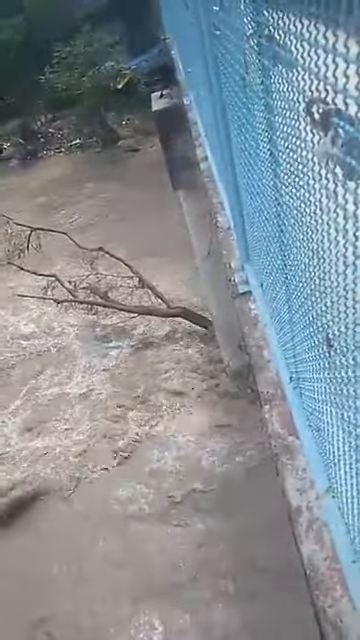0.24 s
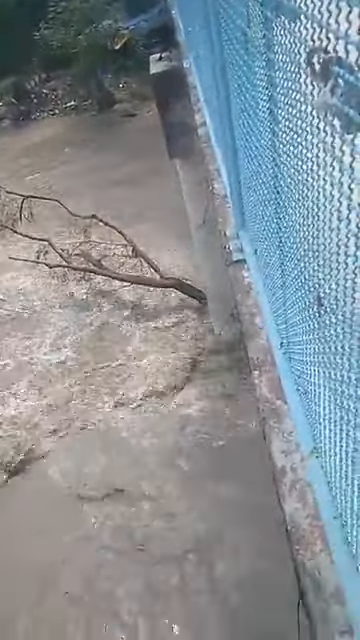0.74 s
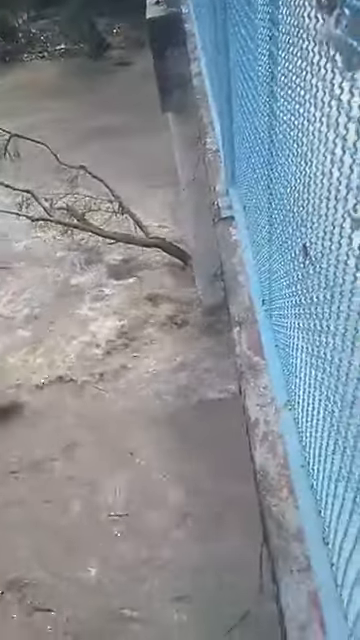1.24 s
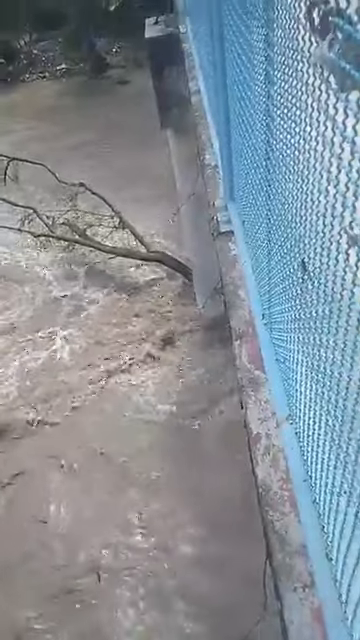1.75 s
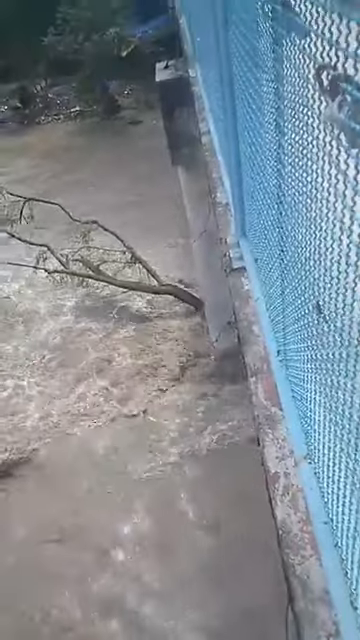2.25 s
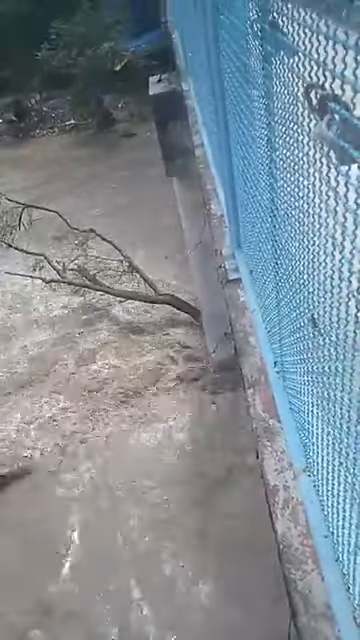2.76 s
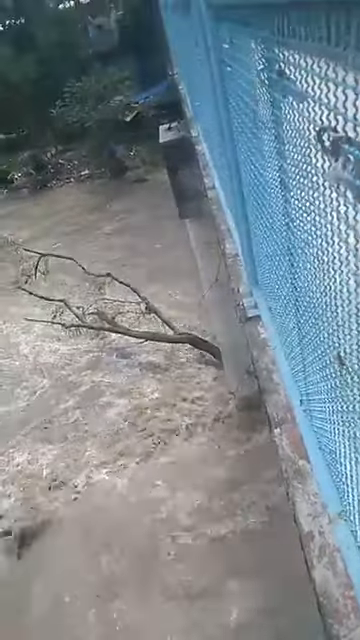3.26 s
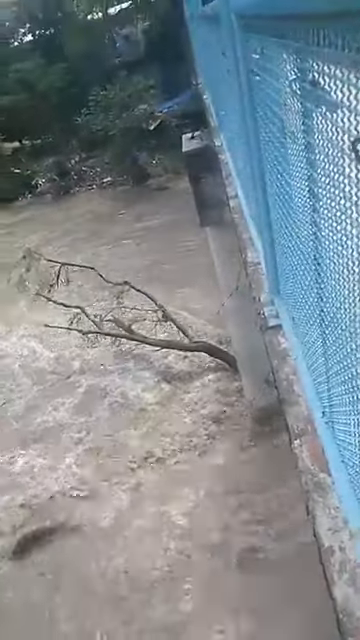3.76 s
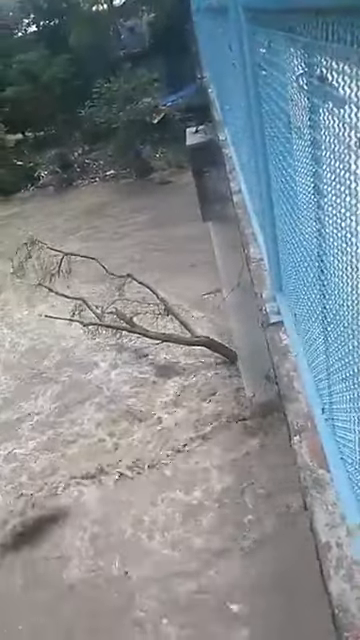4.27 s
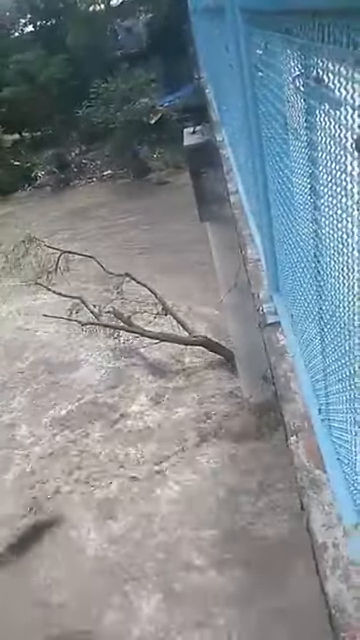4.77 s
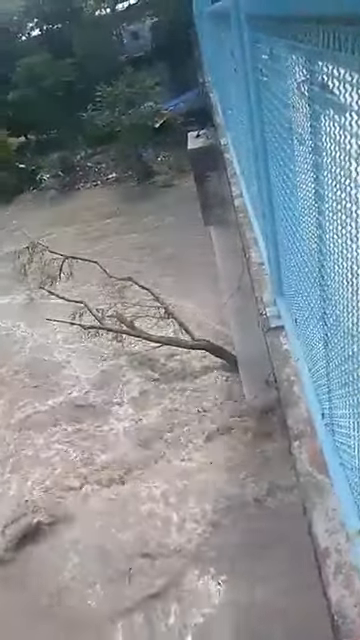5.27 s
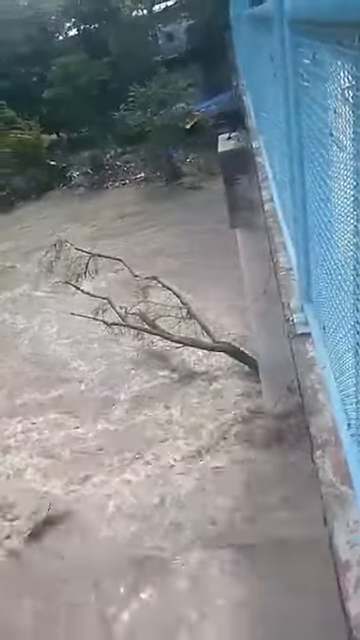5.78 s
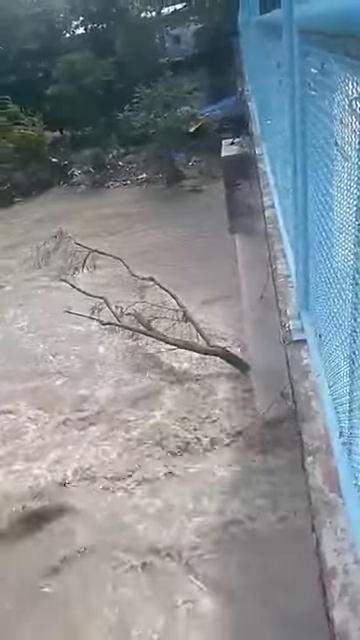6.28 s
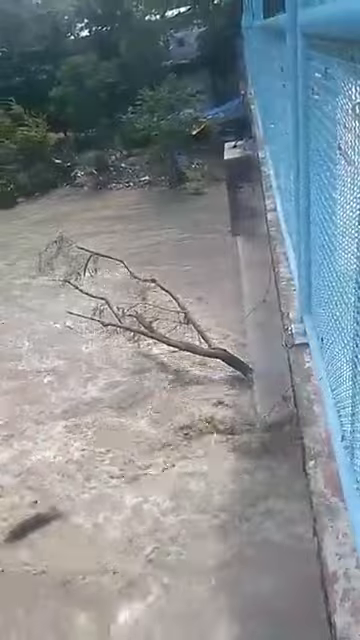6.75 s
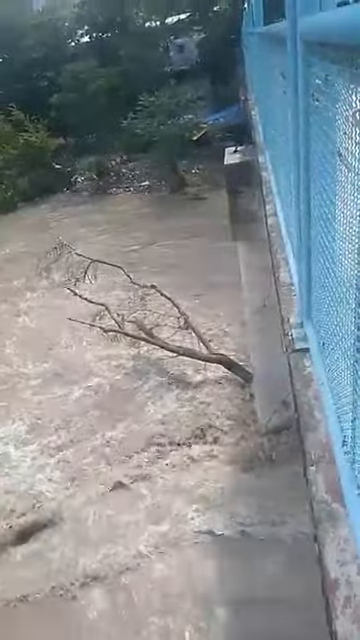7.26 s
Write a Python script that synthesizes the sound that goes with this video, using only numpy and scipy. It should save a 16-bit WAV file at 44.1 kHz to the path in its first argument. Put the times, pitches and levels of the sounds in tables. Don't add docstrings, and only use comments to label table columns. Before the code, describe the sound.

Steady, wide water noise with no pauses: high sizzling spray, midrange churning and a restrained low rumble. A low wind puff opens it, then small hollow glugs and slaps dot the flow, clustering around two and a half seconds and again from five to the end, with heavier surging past six. Open air beside a bridge pier, close phone microphone, thin processed sound with fluttering gaps in the upper bands.

```python
import sys
import numpy as np
from scipy import signal
from scipy.fft import rfft, irfft
from scipy.io import wavfile
from scipy.ndimage import uniform_filter1d, map_coordinates

SR = 44100
rng = np.random.default_rng(int(sys.argv[2]) if len(sys.argv) > 2 else 0)


def magnitude_from_level(level_db):
    exponent = np.asarray(level_db, float) / 20
    return 10 ** exponent


def put_to_file(sound):
    columns = np.atleast_2d(sound).T
    safe = np.clip(columns, -1, 1)
    whole_steps = np.round(safe * 32767)
    wavfile.write(sys.argv[1], SR, whole_steps.astype(np.int16))


N = 331632
FRAME = 1024
SEAM_HZ = 7501


def unit(x):
    return x / np.sqrt(np.mean(np.abs(x) ** 2) + 1e-20)


def along(points, hz):
    f, v = np.transpose(points)
    return np.interp(np.log(hz + 1), np.log(f + 1), v)


def blur(field, bins, frames):
    return np.abs(uniform_filter1d(uniform_filter1d(field, bins, 0), frames, 1))


def frames_of(x):
    return signal.stft(x, SR, nperseg=FRAME, noverlap=FRAME * 3 // 4)


def sound_of(z):
    return signal.istft(z, SR, nperseg=FRAME, noverlap=FRAME * 3 // 4)[1][:N]


def cut(z, holes):
    gain = blur(np.where(holes, magnitude_from_level(-30), 1), 3, 4) ** 2
    return sound_of(z * gain)


def wobble(t, rate_hz):
    knots = rng.standard_normal(int(N * rate_hz / SR) + 4)
    return map_coordinates(knots, [t * rate_hz], mode="nearest")


def coloured(x, spectrum):
    gain = magnitude_from_level(along(spectrum, np.fft.rfftfreq(N, 1 / SR)))
    return unit(irfft(rfft(x) * gain, N))


def rush(spectrum, patchy_db, size=4):
    z = frames_of(rng.standard_normal(N))[2]
    field = blur(blur(rng.standard_normal(z.shape) + 50, size, 9), size, 9)
    patches = magnitude_from_level(patchy_db * unit(field - field.mean()))
    return coloured(sound_of(z * patches), spectrum)


def level_db(t, mean_db, per_churn, per_splash, broad=False):
    # start_s, strength_db
    churn_points = [(0.0, -48.5), (0.29, -39.5), (0.33, -29.5), (0.52, -43.5), (1.59, -47), (1.88, -37.5),
                    (2.03, -56.5), (2.28, -38.5), (3.37, -42.5), (3.94, -35.5), (4.08, -48), (4.36, -35.5),
                    (5.74, -35.5), (5.82, -47.5), (5.9, -35.5), (6.3, -28), (6.83, -34.5), (7.52, -29.5)]
    # start_s, strength_db
    splash_points = [(0.0, -46.5), (0.75, -41), (0.79, -42), (0.98, -41.5), (1.38, -40), (1.42, -39.5),
                     (2.83, -41.5), (2.97, -41.5), (3.33, -43.5), (4.73, -43.5), (5.03, -39), (5.17, -47.5),
                     (5.19, -43), (5.74, -45.5), (6.35, -41), (7.01, -43), (7.39, -43), (7.52, -43.5)]
    grid_s = np.arange(0, N / SR + .01, .01)
    drive = 0
    for points, weight in ((churn_points, per_churn), (splash_points, per_splash)):
        s, db = np.transpose(points)
        drive = drive + weight * np.interp(grid_s, s, db - db.mean())
    drive = uniform_filter1d(drive, 50 if broad else 1)
    swing_db = 0.5 if broad else 2.0
    return mean_db + np.interp(t, grid_s, drive + swing_db * wobble(grid_s, 14))


def layer(spectrum, mean_db, per_churn, per_splash, patchy_db, size=4, broad=False):
    t = np.arange(N) / SR
    return magnitude_from_level(level_db(t, mean_db, per_churn, per_splash, broad)) * rush(spectrum, patchy_db, size)


def roar():
    # hz, level_db
    roar_spectrum = [(25, -41), (70, -4), (200, -1), (400, 1.5), (520, -5), (1000, -1), (1300, 5),
                     (1950, -13), (2060, -29), (2120, -120)]
    return layer(roar_spectrum, -49.5, 0.13, .01, patchy_db=3.0, size=2, broad=True)


def surges():
    # hz, level_db
    surge_spectrum = [(1300, -120), (1340, -2), (1430, 6.5), (1500, 9), (1640, 4.5), (1720, 6),
                      (1760, -120)]
    # hz, level_db
    upper_spectrum = [(1600, -120), (1650, -33), (1720, -8), (1920, -6.5), (2040, -18.5), (2120, -120)]
    lower = layer(surge_spectrum, -40.5, 0.53, 0.03, patchy_db=4.5, size=3)
    return lower + layer(upper_spectrum, -47, 0.91, 0.03, patchy_db=4.5, size=3)


def splashes():
    # hz, level_db
    splash_spectrum = [(2450, -120), (2540, -13.5), (2640, 1), (2750, 5), (3000, 5), (3250, 0), (3400, -49),
                       (3480, -120)]
    return layer(splash_spectrum, -42, 0.16, 1.6, patchy_db=2.5)


def spray():
    # hz, level_db
    spray_spectrum = [(3780, -120), (3850, -6.5), (4000, -5), (4170, 3.5), (4950, 3.5), (5200, 3),
                      (5420, -75), (5980, -65), (6100, -15), (6330, 6), (6520, -4.5), (6750, 5),
                      (7380, 11.5), (7600, -6)]
    return layer(spray_spectrum, -29, 0.12, 0.4, patchy_db=1.56, size=8, broad=True)


def valleys():
    # hz, level_db
    trough_spectrum = [(1980, -120), (2030, 0), (2090, -3), (2135, -13), (2200, 0), (2400, 0), (2480, -9),
                       (2560, -120)]
    # hz, level_db
    lower_gap_spectrum = [(3150, -120), (3250, 1.5), (3500, -6.5), (3750, 2), (3950, -26), (4050, -120)]
    # hz, level_db
    upper_gap_spectrum = [(5050, -120), (5150, -3), (5300, -0.5), (5460, 1.5), (5620, 2), (5880, -5),
                          (6050, 6.5), (6200, -3), (6300, -120)]
    trough = layer(trough_spectrum, -59, .05, 0, patchy_db=2.2, size=1, broad=True)
    lower_gap = layer(lower_gap_spectrum, -46.5, -0.02, 1, patchy_db=4.5, size=3)
    upper_gap = layer(upper_gap_spectrum, -45, 0.6, 0.56, patchy_db=5, size=3, broad=True)
    return trough + lower_gap + upper_gap


def notched(x):
    # start_s, centre_hz, width_hz
    notch = [(0.0, 3760, 330), (.3, 3460, 157), (.55, 3760, 90), (.86, 3540, 326), (1.2, 3600, 495),
             (1.5, 3700, 360), (1.85, 3620, 370), (2.2, 3610, 291), (2.7, 3700, 256), (2.9, 3700, 30),
             (3.15, 3600, 289), (3.62, 3560, 478), (3.95, 3440, 294), (4.3, 3490, 324), (4.6, 3600, 260),
             (5.06, 3507, 372), (5.42, 3520, 174), (5.5, 3380, -160)]
    # centre_s, centre_hz, width_hz, length_s
    dropouts = [(.43, 5750, 520, .17), (.62, 5550, 300, .08), (.96, 5940, 200, .2), (1.2, 5570, 350, .08),
                (1.33, 5980, 200, .15), (1.7, 5820, 200, .2), (2.0, 5750, 750, .09),
                (3.053, 5780, 200, .15), (3.65, 5840, 250, .4), (4.55, 5760, 300, .1),
                (5.42, 5950, 150, .2), (5.8, 6000, 150, .12), (6.9, 5850, 150, .25), (7.0, 3770, 240, .22),
                (2.593, 2330, 450, .18), (6.62, 2280, 400, .62), (4.28, 5600, 250, .08),
                (5.8, 3700, 230, .25), (7.1, 3400, 200, .3), (7.33, 3280, 200, .3), (6.62, 3400, 130, .2),
                (5.6, 3300, 120, .2), (6.2, 3750, 120, .2), (6.3, 5900, 120, .25), (7.3, 3800, 120, .2)]
    # centre_s, length_s
    bridged = [(1.347, 0.033), (1.737, 0.048), (3.407, 0.016), (5.147, 0.032)]
    ragged_hz, hold_s = 22, .07
    hz, t, z = frames_of(x)
    t = (t // hold_s + .5) * hold_s
    s, centre_hz, width_hz = np.transpose(notch)
    open_share = 1 - sum(np.exp(-((t - when) / length) ** 4) for when, length in bridged)
    half_hz = np.interp(t, s, width_hz) / 2 * open_share + 55 + ragged_hz * wobble(t, 6)
    middle_hz = np.interp(t, s, centre_hz) + ragged_hz * wobble(t, 5)
    inside = np.abs(hz[:, None] - middle_hz) < half_hz
    for when, middle, span, length in dropouts:
        inside |= np.outer(np.abs(hz - middle) < span / 2, np.abs(t - when) < length / 2)
    return cut(z, inside)


def river():
    return notched(roar() + surges() + splashes() + spray() + valleys())


def wind():
    # hz, level_db
    port = [(20, -19), (50, -7.5), (70, 2), (100, -6), (160, 0), (220, -120)]
    # centre_s, over_breeze_db, length_s
    gusts = [(0.0, 22, 0.37), (2.63, 5, .1), (3.503, 10, 0.081), (6.64, 18, 0.051)]
    t = np.arange(N) / SR
    gust_db = sum(db * np.exp(-((t - s) / length) ** 2) for s, db, length in gusts)
    breeze_db = -68.5
    return magnitude_from_level(breeze_db + gust_db) * rush(port, patchy_db=-1.5, size=2)


def pockets():
    # centre_s, pitch_hz, level_db, length_s
    deep_gulps = [(0.0, 363, -40, .04), (.226, 344, -45.5, 0.066), (.374, 379, -46, 0.071),
                  (.639, 325, -45.5, 0.064), (1.219, 375, -46.5, 0.081), (1.403, 390, -41, 0.098),
                  (1.693, 377, -46.5, 0.065), (1.956, 244, -45, 0.058), (2.24, 365, -46.5, 0.13),
                  (2.353, 270, -37.5, .043), (2.414, 345, -36.5, 0.13), (2.581, 328, -41, 0.09),
                  (2.693, 322, -33, 0.044), (2.795, 327, -44.5, .13), (3.713, 370, -44.5, .11),
                  (4.238, 343, -43.5, 0.15), (4.374, 377, -47, .035), (4.597, 350, -47, .034),
                  (4.851, 282, -42.5, .041), (5.045, 364, -45.5, .036), (5.207, 331, -38.5, 0.076),
                  (5.324, 374, -43.5, 0.064), (5.462, 389, -49, 0.09), (6.056, 255, -41.5, .04),
                  (6.276, 408, -46.5, 0.05), (6.5, 366, -40.5, 0.095), (6.605, 337, -36, 0.13),
                  (6.649, 245, -36.5, 0.087), (6.94, 322, -39.5, 0.12), (7.282, 349, -39.5, 0.093)]
    # centre_s, pitch_hz, level_db
    small_glugs = [(.169, 724, -44), (.431, 664, -47), (.58, 233, -49), (.635, 643, -43), (1.299, 199, -48),
                   (1.527, 763, -46), (1.736, 793, -44), (1.828, 965, -45.5), (2.607, 190, -47),
                   (2.648, 953, -48), (3.052, 1010, -42), (3.094, 866, -43), (5.267, 1090, -37),
                   (3.83, 703, -50), (3.884, 980, -49), (4.232, 980, -50), (5.05, 550, -52),
                   (5.278, 726, -40.5), (5.527, 906, -47.5), (5.635, 1086, -45), (6.037, 900, -42.5),
                   (6.2, 970, -49), (6.635, 970, -41.5), (6.641, 766, -45), (6.849, 980, -46),
                   (7.078, 352, -44.5), (7.156, 710, -45.5), (7.39, 910, -45), (7.413, 300, -46),
                   (7.52, 406, -45)]
    # centre_s, level_db, length_s
    slap_events = [(.61, -38.5, 0.067), (.813, -39, .059), (1.843, -46.5, 0.26), (2.113, -40, 0.14),
                   (2.252, -47, 0.13), (2.759, -46.5, .071), (2.868, -41, 0.12), (4.955, -48.5, 0.26),
                   (5.267, -42, 0.062), (5.33, -39.5, 0.19), (5.486, -42, 0.054), (5.806, -42.5, 0.097),
                   (6.13, -37.5, 0.1), (6.298, -43.5, 0.13), (6.467, -46.5, 0.29), (6.565, -44, .045),
                   (6.683, -35, 0.13), (6.842, -48, 0.27), (7.175, -47.5, 0.36), (7.3, -38, .042),
                   (7.483, -43, 0.17)]
    glug_s, slap_hz, slap_spread = 0.054, 1215, .05
    glugs = [(*row, glug_s) for row in small_glugs]
    slaps = []
    for s, db, length in slap_events:
        pitch_hz = slap_hz * (1 + slap_spread * rng.uniform(-0.986, 1))
        slaps.append((s, pitch_hz, db, length))
    low_hz, high_hz = 180, 1150
    strays = []
    for a, b, c in rng.random((90, 3)):
        strays.append((a * N / SR, low_hz * (high_hz / low_hz) ** b, -56 + 6 * c, glug_s))
    return [*deep_gulps, *glugs, *slaps, *strays]


def gulps():
    out = np.zeros(N + 2 * SR)
    t = np.arange(-SR // 5, SR // 5) / SR
    place = [(t - t[0]) * 125]
    for s, hz, db, length in pockets():
        re, im = rng.standard_normal((2, 80))
        swell = magnitude_from_level(-5 * (2 * t / np.maximum(length - .025, .025)) ** 2)
        flutter = map_coordinates(re, place) + 1j * map_coordinates(im, place)
        burst = swell * np.real(flutter * np.exp(2j * np.pi * hz * t))
        burst *= np.linalg.norm(swell) / np.linalg.norm(burst)
        out[round(s * SR) + SR * 4 // 5:][:len(t)] += magnitude_from_level(db) * burst
    return out[SR:SR + N]


def starved(x, masked_db=-15, quiet_db=-88):
    hz, _, z = frames_of(x)
    power = np.abs(z) ** 2
    around = blur(power, 40, 8)
    masking = around ** .25 * around.mean(axis=1, keepdims=True) ** .75
    limit = masking * magnitude_from_level(2 * masked_db) + magnitude_from_level(2 * quiet_db)
    weak = (blur(power, 1, 13) < limit) & (hz[:, None] > 2000)
    return cut(z, weak)


def copied_up(low):
    spectrum = rfft(low)
    start, step = round(740 * N / SR), round(6761 * N / SR)
    copy = np.zeros_like(spectrum)
    for k in (1, 2):
        copy[start + k * step:start + (k + 1) * step] = spectrum[start:start + step]
    return irfft(copy, N)


def rebuilt_treble(low, flatten=0.67):
    # hz, level_db
    treble = [(7500, 3.5), (7800, -1.5), (8230, 1.5), (8650, -2.5), (8850, 8), (9300, 1), (9900, 4.5),
              (10300, -4), (10900, -8), (11900, -6.5), (12700, -10), (13900, -10), (14400, -7),
              (15700, -16.5)]
    # hz, level_db
    hiss = [(7500, -10), (7700, -22), (8950, -13), (9200, -24), (10300, -30), (11000, -24), (12600, -17),
            (14200, -12), (14400, -3), (15350, -2), (15550, 4)]
    # centre_hz, width_hz, level_db
    ridges = [(7870, 120, 4), (8200, 125, -0.5), (7750, 230, -0.5)]
    hz, t, z = frames_of(copied_up(low))
    power = np.abs(z) ** 2
    wide_tile = np.abs(hz[:, None] - 10100) < 1300
    tiles = np.where(wide_tile, blur(power, 20, 8), blur(power, 7, 8)) + 1e-12
    z = unit(z / tiles ** (flatten / 2))
    z = z + magnitude_from_level(along(hiss, hz))[:, None] * unit(frames_of(rng.standard_normal(N))[2])

    peak_db = level_db(t, -29.5, 0.0346, 0.017, broad=True)
    shoulder_db = level_db(t, -15, 0.45, -0.98, broad=True)
    shoulder_db = shoulder_db - 8 * np.exp(-((t - 1.43) / 0.43) ** 4)
    air_db = level_db(t, -8.5, 0.083, 0.06, broad=True)
    air_db = air_db + .85 * map_coordinates(rng.standard_normal(160), [t * 20])
    zones_hz = 8310, 9650, 10700, 10100
    shoulder = np.interp(hz, zones_hz, (0, 1, 1, 0))[:, None] * shoulder_db
    air = np.interp(hz, zones_hz, (0, 0, 0, 1))[:, None] * air_db

    crest_db = sum(db / (1 + (2 * (hz - c) / w) ** 2) for c, w, db in ridges)
    shape = magnitude_from_level(along(treble, hz) + crest_db) * (hz > SEAM_HZ) * (hz < 15780)
    return sound_of(z * shape[:, None] * magnitude_from_level(peak_db + shoulder + air - 15.5))


def scene():
    return (river() + gulps() + wind())[None]


def low_pass(x):
    return signal.sosfilt(signal.butter(12, 15970, fs=SR, output="sos"), x)


def record(dry):
    below_seam = np.fft.rfftfreq(N, 1 / SR) < SEAM_HZ
    low = irfft(rfft(starved(dry[0])) * below_seam, N)
    mix = (low + rebuilt_treble(low))[None]
    return low_pass(mix)


dry = scene()
out = record(dry)
put_to_file(out)
```